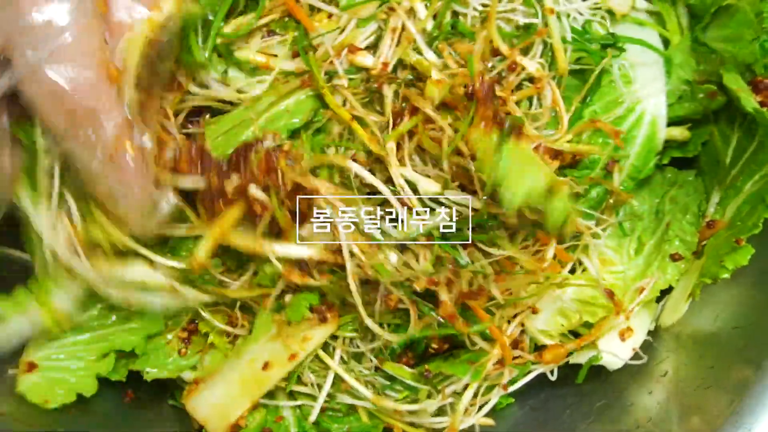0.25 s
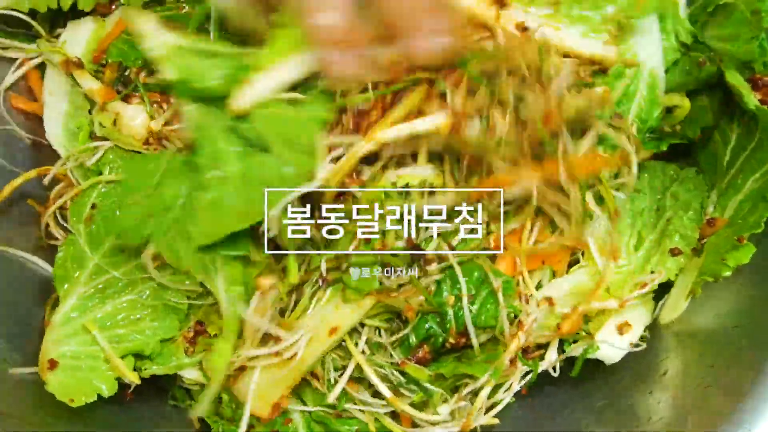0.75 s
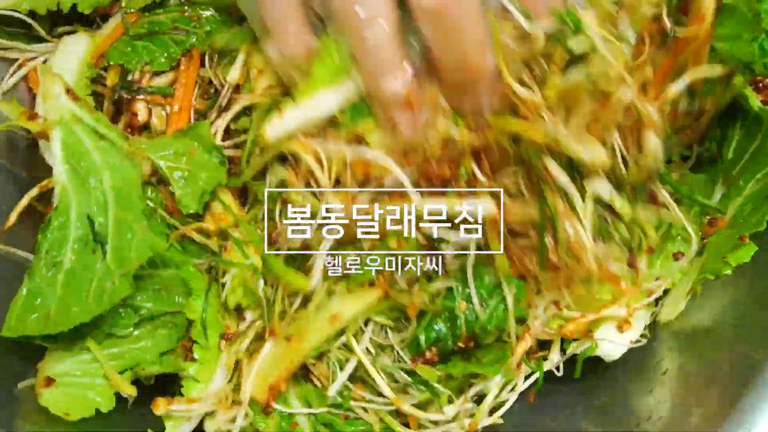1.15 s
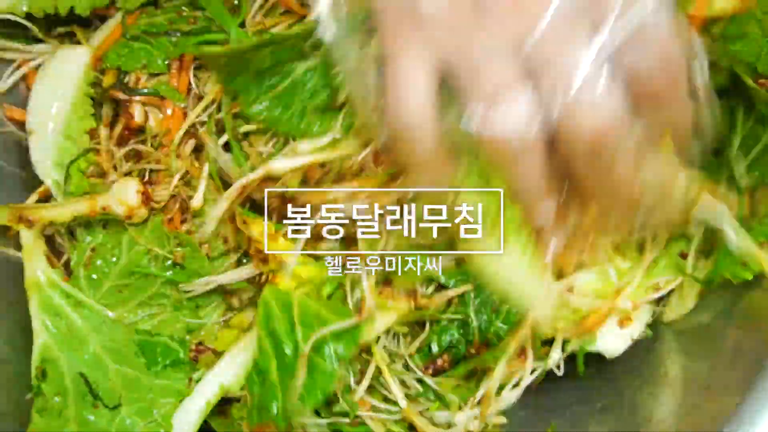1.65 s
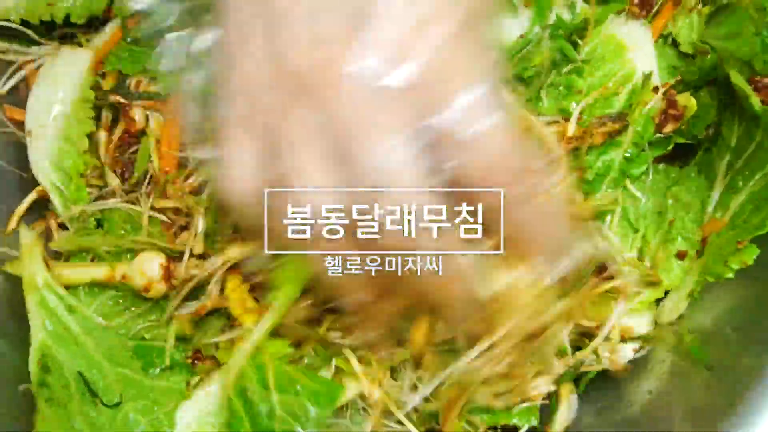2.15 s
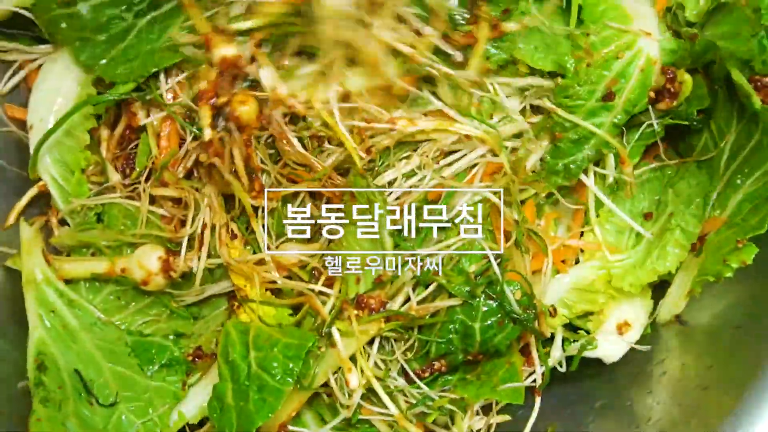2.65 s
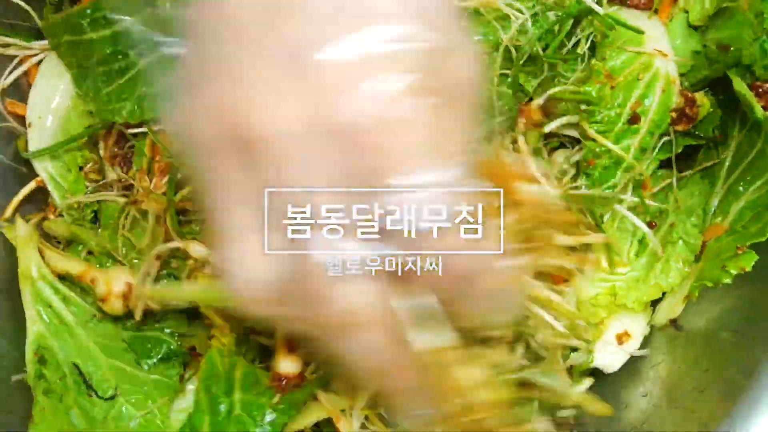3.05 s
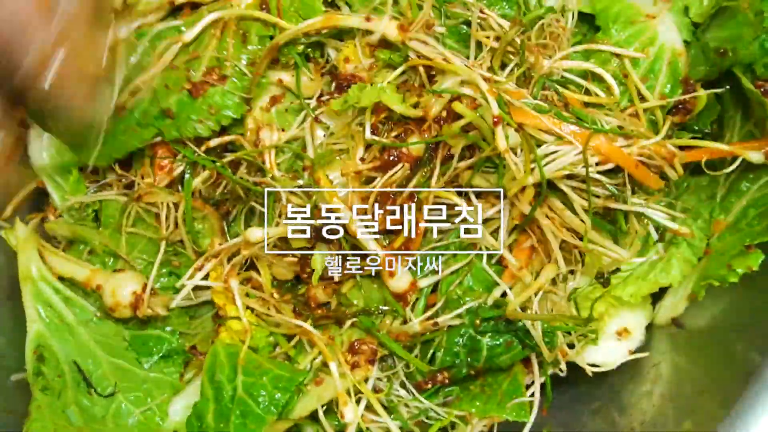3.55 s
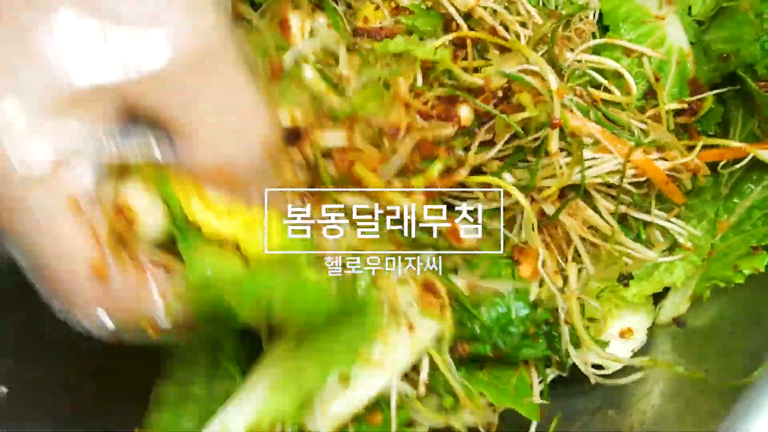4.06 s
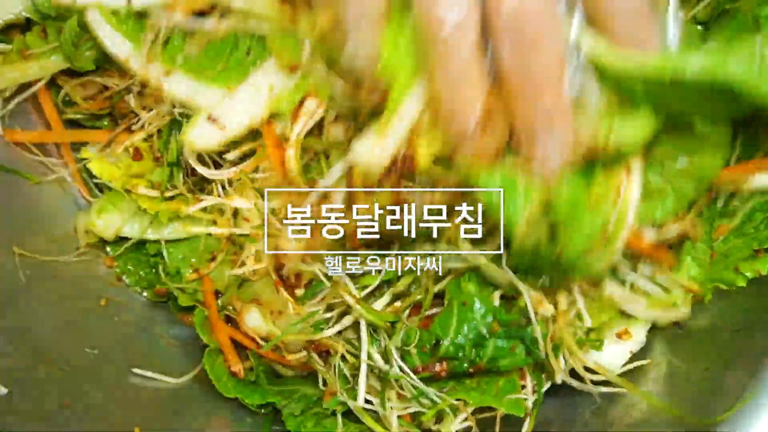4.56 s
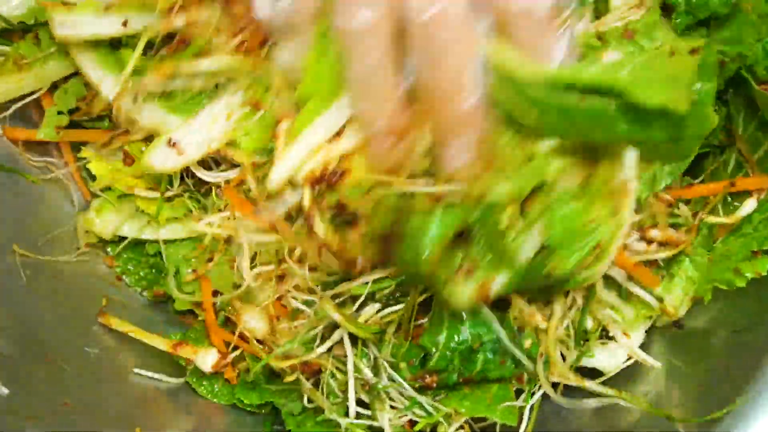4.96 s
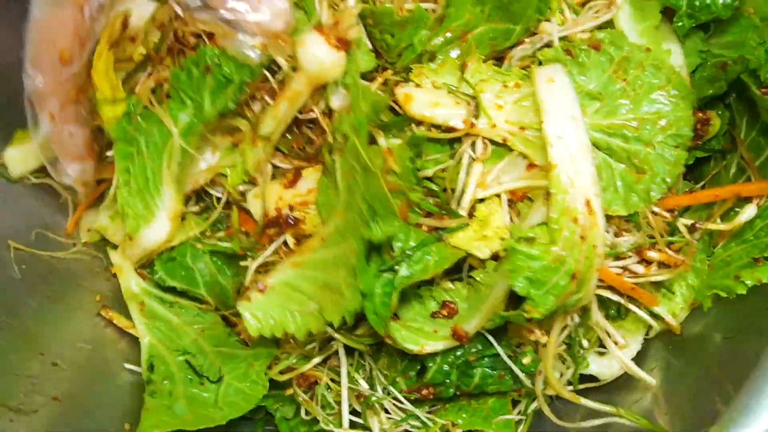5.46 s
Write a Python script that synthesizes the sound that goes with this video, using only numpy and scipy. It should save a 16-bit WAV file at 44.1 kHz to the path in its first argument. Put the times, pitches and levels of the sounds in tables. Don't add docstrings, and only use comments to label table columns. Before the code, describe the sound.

Close, jerky wet rustling of leafy vegetables being mixed by hand, thin plastic glove snapping, soft metal bowl scuffs, faint appliance hum behind.

```python
import sys
import numpy as np
from scipy import signal
from scipy.fft import rfft, irfft, next_fast_len
from scipy.io import wavfile
from scipy.ndimage import uniform_filter1d

SR = 44100
rng = np.random.default_rng(int(sys.argv[2]) if len(sys.argv) > 2 else 0)


def int16_out(signal):
    q = np.round(np.clip(np.atleast_2d(signal).T, -1, 1) * 32767)
    wavfile.write(sys.argv[1], SR, q.astype(np.int16))


def gain_from_db(level_db):
    decades = np.asarray(level_db, float) / 20
    return 10 ** decades


N = 251652
SIDES = np.array([[0.5], [-0.5]])

# (frequency [Hz], level [dB per Hz])
AIR_COLOUR = [(20, -30), (50, -19.5), (100, -6.5), (200, -13), (400, -15.5), (800, -17), (1150, -26),
              (1700, -22), (3000, -42), (8000, -48), (16000, -45)]
AIR_DB = -48.5
# (pitch [Hz], pitch waver [share], level [dB])
APPLIANCES = [
    (46.7, 0.021, -56),
    (122.1, 0.027, -63.5),
    (218.7, 0.023, -58.5),
]

# (full-effort start [s], hold [s], effort [dB], glove crumple against effort [dB])
STROKES = [(-0.018, 0.029, -36.5, -3.5), (0.119, 0.014, -32.5, -1), (0.177, 0.005, -33, -7.5),
           (0.307, 0.0055, -33, -3), (0.373, 0.011, -37, -4), (0.445, 0.19, -31, -1.0),
           (0.698, 0.28, -32, -2), (1.072, 0.006, -33.5, -2), (1.154, 0.023, -32.5, 0),
           (1.244, 0.2, -34, 1.5), (1.543, 0.21, -33, -1), (1.812, 0.22, -32, -1.8), (2.107, 0.17, -33, -2),
           (2.338, 0.13, -36.5, -1), (2.507, 0.12, -43.5, -3), (2.705, 0.052, -38, -3.5),
           (2.821, 0.12, -31.5, 0.2), (3.044, 0.005, -42.5, 2), (3.157, 0.047, -38, -5.5),
           (3.258, 0.0092, -32, -1), (3.339, 0.24, -32, -3), (3.621, 0.15, -30.5, -3.2),
           (3.775, 0.018, -24.5, -8.5), (3.87, 0.13, -31.5, -5), (4.388, 0.16, -32.5, -0.2),
           (4.522, 0.22, -29.5, -2), (4.832, 0.098, -34, -1.8), (5.056, 0.1, -36, -3.5),
           (5.273, 0.12, -29, -3), (5.404, 0.367, -26, -7)]
# (start [s], hold [s], effort [dB])
CRUNCHES = [
    (0.448, .01, -36),
    (0.76, 0.013, -34),
    (1.204, 0.0091, -35.5),
    (1.353, 0.028, -31),
    (1.672, 0.011, -29.5),
    (2.82, 0.008, -37),
    (5.554, 0.035, -32),
]
RISE_DB_PER_S, SAG_DB_PER_S, FALL_DB_PER_S, FILM_FALL_DB_PER_S, REST_DB = 308, 0.5, 118.5, 213, -59
# (time [s], left-right balance [dB])
HANDS = [
    (0.0, -1),
    (0.17, -0.5),
    (3.39, -0.5),
    (3.54, 2),
    (4.66, -1),
    (5.71, 2),
]

# (time [s], jump [dB])
SLIPS = [(0.012, 3.5), (0.087, 3), (0.107, 5), (0.2, 9.5), (0.277, 8), (0.297, 10), (0.402, 1),
         (0.458, 5), (0.47, -1), (0.501, -1), (0.537, 3.5), (0.569, 7), (0.579, 3.5), (0.591, 5),
         (0.619, 7), (0.636, 6), (0.677, 9.5), (0.709, 1.5), (0.735, 3), (0.805, 7.5), (0.842, 3.5),
         (0.896, 3), (0.937, 5.5), (0.973, 3), (1.007, 10), (1.093, 3.0), (1.139, -3), (1.16, 3.0),
         (1.211, 11), (1.294, 1), (1.319, 3.0), (1.383, 6.5), (1.449, -2), (1.569, -1), (1.632, 7.5),
         (1.664, 7.5), (1.714, 0), (1.749, 5), (1.806, 0), (1.89, 5.5), (1.916, 9), (1.951, 4.5),
         (1.987, 6.5), (2.001, 4.0), (2.023, 6), (2.084, 9), (2.157, 7.5), (2.201, 2), (2.267, 7),
         (2.338, 4), (2.379, 6.5), (2.401, 10), (2.447, 2), (2.458, -2), (2.503, 4.5), (2.53, 5),
         (2.568, 11), (2.67, 11), (2.766, 7),
         (2.852, 7.4), (2.891, 4.5), (2.984, 5), (3.023, 6), (3.059, 8.5), (3.158, 3.5), (3.198, 5.8),
              (3.277, 2.7), (3.358, 2.2), (3.405, 5.7), (3.415, 2.4), (3.528, 2.1), (3.546, 3.7),
              (3.6, 4.0), (3.644, 2.2), (3.695, 1.3), (3.75, 1.9), (3.765, 1.5), (3.794, 2.0), (3.825, 1.3),
              (3.885, 4.1), (3.919, 4.9), (3.95, 2.1), (4.059, 4.5), (4.099, 5.0), (4.132, 4.4), (4.374, 3),
              (4.396, 2.1), (4.433, 1.5), (4.45, 5.5), (4.485, 5.3), (4.515, 4.4), (4.55, 6.6),
              (4.573, 3.1), (4.618, 2.1), (4.661, 2.6), (4.694, 4.8), (4.712, 1.8), (4.782, 4.9),
              (4.836, 3.3), (4.848, 4.8), (4.876, 5.1), (4.945, 8), (5.026, 12), (5.078, 2.8), (5.115, 7.4),
              (5.145, 3), (5.184, 7.1), (5.221, 11), (5.265, 3.5), (5.31, 3.5), (5.378, 2.2), (5.408, 1.9),
              (5.469, 2), (5.488, 6.6), (5.51, 2.5), (5.584, 1.2), (5.616, 2.2), (5.669, 4.4),
         (4.018, 5),
    (4.029, 11),
    (4.047, 17),
    (4.075, 8),
    (4.16, 3),
    (4.204, 0),
    (4.296, 4),
    (4.313, 1),
    (4.331, 6),
]
SLIP_RISE_S, SLIP_FADE_S, SLIP_SHARE, STRAY_SLIP_SHARE = 0.0018, 0.0056, 0.86, 0.31
LOOSE_DB, LOOSE_RANGE_DB = -29.5, 1.5

# (frequency [Hz], level [dB])
LEAF_COLOUR = [(800, -2), (1100, -10), (1400, -8.5), (1900, -4.5), (2600, -4), (3600, -2.5), (5000, -4),
               (7500, -3), (12000, -5)]
# (time [s], centre [Hz])
LEAF_SIZE = [(0.0, 3160), (0.16, 3230), (1.76, 2700), (1.97, 3140), (2.34, 2580), (2.49, 3570),
             (2.54, 2950), (3.42, 2680), (3.5, 3400), (3.96, 2300), (4.16, 3000), (4.21, 2350),
             (4.56, 3360), (4.62, 2590), (5.32, 3200), (5.39, 2230), (5.59, 2200), (5.71, 2760)]
SIZE_WIDTH_HZ, SIZE_DB = 2150, -1
# (time [s], peak [dB], pitch [Hz])
STEM_TICKS = [(0.0887, -16, 3910), (0.2014, -15, 3450), (0.2778, -23, 3120), (0.4025, -16, 3660),
              (0.6784, -21, 2900), (0.9747, -15, 3360), (1.6646, -16, 2370), (1.8048, -19, 3530),
              (1.8931, -16, 2970), (1.9525, -14, 3170), (2.2677, -16, 2880), (2.37, -19, 3190),
              (2.4019, -22, 3420), (2.5027, -19, 3790), (2.8355, -17, 2610), (2.8549, -13, 2320),
              (2.8918, -19, 2890), (3.0584, -23, 3360), (3.7514, -16, 2140), (3.8262, -8, 2260),
              (4.366, -22, 2590), (4.4867, -17, 2240), (4.5506, -17, 3600), (4.6613, -15, 2720),
              (4.6942, -14, 2620), (5.0489, -18, 2520), (5.2555, -16, 3250), (5.3083, -18, 3500),
              (5.3807, -14, 2290), (5.6166, -13, 2650)]
# (time [s], peak [dB],
# pitch [Hz])
LEAF_TICKS = [(0.0343, -23, 3190), (0.5392, -16, 2390), (0.5686, -16, 2750), (0.7966, -15, 3630),
              (1.2057, -19, 3850), (2.3804, -20, 3140), (2.4593, -15, 4020), (2.5641, -25, 2620),
              (2.7686, -21, 3560), (2.9866, -21, 3940), (3.0014, -26, 4220), (3.0644, -26, 2280),
              (3.1592, -27, 2890), (3.241, -18, 3400), (3.6027, -16, 3340), (3.6456, -16, 2450),
              (3.9509, -20, 2100), (4.1011, -26, 4300), (4.133, -28, 2160), (4.1335, -29, 4500),
              (4.096, -31, 5200), (4.204, -36, 1100), (4.313, -36, 1800), (4.1609, -33, 4500),
              (4.2966, -36, 2560), (4.8364, -17, 3490), (4.8484, -20, 2590), (5.0769, -17, 4300),
              (5.1178, -18, 4200), (5.1472, -21, 2270), (5.1856, -24, 4140), (5.2235, -26, 2270),
              (5.4705, -16, 2230), (5.5857, -12, 2220),
              (0.0563, -29.0, 3220.0), (0.1367, -22.0, 4190.0), (0.2535, -29.0, 2820.0), (0.3, -23.0, 3040.0),
          (0.4606, -18.0, 4320.0), (0.6205, -19.0, 3810.0), (0.7365, -19.0, 4190.0),
          (0.8035, -18.0, 3220.0), (0.8434, -23.0, 4720.0), (0.9276, -21.0, 1990.0),
          (0.9401, -21.0, 2950.0), (1.0405, -23.0, 3890.0), (1.1552, -18.0, 2870.0),
          (1.3622, -19.0, 2800.0), (1.4185, -22.0, 4230.0), (1.5702, -20.0, 4760.0),
          (1.6103, -22.0, 4500.0), (1.647, -21.0, 4640.0), (1.7151, -21.0, 2750.0), (1.9747, -22.0, 2630.0),
          (2.0025, -21.0, 3260.0), (2.0788, -24.0, 3890.0), (2.1725, -22.0, 2400.0),
          (2.2574, -23.0, 4470.0), (2.5307, -23.0, 5140.0), (2.5827, -31.0, 4660.0),
          (2.9131, -20.0, 3680.0), (3.0223, -28.0, 4180.0), (3.302, -18.0, 4290.0), (3.3574, -20.0, 3200.0),
          (3.5728, -24.0, 4500.0), (3.6962, -21.0, 4380.0), (4.06, -25.0, 4210.0), (4.398, -23.0, 4530.0),
          (4.41, -23.0, 4460.0), (4.4348, -23.0, 4550.0), (4.4511, -20.0, 4130.0), (4.6193, -20.0, 2750.0),
          (4.6326, -19.0, 4470.0), (4.6784, -19.0, 3370.0), (4.784, -21.0, 2690.0), (4.9455, -22.0, 3210.0),
          (5.214, -24.0, 4160.0), (5.5133, -18.0, 2540.0), (5.7006, -15.0, 3390.0)]
ONSET_DELAY_S = 0.0012

# (frequency [Hz], level [dB])
FILM_COLOUR = [(2000, 0), (4000, 3.5), (6000, 3.5), (9000, 2.5), (12500, 4), (15000, -2), (17000, -15)]
# (time [s], peak [dB], film pitch [Hz],
# left-right balance [dB])
FILM_SNAPS = [(0.0742, -28, 9410, -1.0), (0.0877, -7, 12600, -0.5), (0.089, -8, 8000, 0.0),
              (0.4614, -7, 9530, 1.0), (0.6709, -15, 9450, -4.0), (0.7362, -14, 13300, 0.0),
              (1.0071, -13, 11100, -0.5), (1.1403, -10, 12700, -2.5), (1.3204, -7, 6860, 0.0),
              (1.491, -12, 11300, 1.0), (1.6038, -11, 10400, 2.0), (2.0832, -16, 10700, 0.5),
              (2.3231, -15, 8040, 0.0), (2.5022, -11, 7660, -3.0), (2.5306, -9, 10300, 0.5),
              (3.0579, -19, 8990, 0.5), (3.2745, -8, 10200, -5.0), (3.3288, -14, 12500, -1.5),
              (3.4052, -10, 14000, -1.5), (3.5294, -8, 7890, 2.5), (3.5972, -15, 10500, 2.0),
              (3.7319, -11, 12300, 3.0), (4.3979, -13, 12000, 1.0), (4.4353, -10, 13400, -1.0),
              (4.5501, -14, 6870, 0.0), (4.6194, -9, 11800, 1.5), (5.028, -22, 12300, -0.5),
              (5.0769, -10, 6070, -1.5), (5.1467, -12, 9840, 2.0), (5.255, -10, 6180, 1.5),
              (5.4789, -15, 7950, 1.5), (5.488, -11, 8000, 0.0), (2.712, -19, 9000, 0.0),
              (0.0564, -24, 8100, -4.0), (0.0976, -15, 7800, -2.0), (0.1085, -15, 8370, 2.0),
           (0.1998, -20, 6880, 3.0), (0.2773, -19, 5210, 5.0), (0.3089, -18, 8590, 3.0),
           (0.4715, -7, 9740, -3.0), (0.5796, -12, 7410, -1.0), (0.5913, -13, 12490, -2.0),
           (0.7105, -12, 9600, -1.0), (0.7911, -15, 14150, -5.0), (0.8166, -12, 12400, -1.0),
           (0.8848, -15, 11650, -2.0), (1.0956, -17, 10990, -1.0), (1.1197, -15, 10990, -2.0),
           (1.18, -15, 12450, -5.0), (1.647, -13, 8930, -5.0), (1.6576, -12, 10610, -2.0),
           (1.9526, -13, 6680, 5.0), (2.0012, -15, 9510, 1.0), (2.0231, -14, 10820, 2.0),
           (2.0558, -17, 11020, 0.0), (2.2685, -17, 8270, 5.0), (2.4489, -16, 11380, -2.0),
           (2.4593, -13, 7880, -3.0), (2.5374, -14, 10330, 3.0), (2.5711, -24, 6220, 3.0),
           (2.7201, -16, 10410, 1.0), (2.768, -19, 7830, -4.0), (2.8917, -16, 8030, 4.0),
           (3.0642, -20, 8920, 3.0), (3.3019, -14, 5660, -5.0), (3.3551, -15, 13500, -3.0),
           (3.4182, -12, 7250, -4.0), (3.9624, -18, 11750, 0.0), (4.0197, -19, 6330, 5.0),
           (4.06, -25, 6730, 2.0), (4.758, -17, 8640, -4.0), (4.8488, -16, 9690, 4.0),
           (4.8782, -18, 5700, -4.0), (4.936, -16, 11670, -1.0), (5.1175, -20, 5360, -3.0),
           (5.4109, -14, 10540, 2.0), (5.6051, -15, 10460, -1.0), (5.6914, -14, 10070, 5.0)]
CREASE_HZ, STRAY_CREASES_PER_S, STRAY_CREASE_DB = 7870, 5, 16
SNAP_TILT_DB_PER_OCT = -3

# (frequency [Hz], width [Hz], level [dB])
HOLLOW = [
    (364, 78, -15),
    (547, 36, -4.5),
    (759, 88, 2.5),
    (864, 46, 2.5),
    (1293, 270, -2.5),
]
# (time [s], bowl rub against effort [dB])
DEPTH = [(0.0, -9.5), (0.12, -14), (0.42, -11), (1.0, -11.5), (1.3, -7.5), (1.7, -11), (2.3, -10),
         (2.55, -12.5), (2.85, -7.5), (3.1, -9), (3.3, -10.5), (3.75, -10.5), (4.1, -12.5), (4.4, -15.5),
         (4.6, -9.5), (5.1, -12), (5.4, -11), (5.71, -12.5)]
# (time [s], peak [dB], pitch [Hz])
KNOCKS = [(1.197, -27.5, 789), (2.73, -29, 750), (2.755, -30, 760), (2.85, -17.5, 820), (2.913, -21.5, 813),
          (3.255, -29, 757), (3.75, -20.5, 855), (4.028, -33, 730), (4.35, -26, 720), (4.564, -21, 750),
          (4.693, -22.5, 754), (5.267, -21, 372), (5.347, -19, 730), (5.441, -25, 337), (5.641, -21, 884)]
# (start [s], hold [s], level [dB])
SHOVES = [
    (1.2, .02, -58),
    (1.65, 0.028, -49),
    (2.0, 0.025, -44),
    (2.83, 0.026, -39),
    (3.69, 0.02, -39),
    (3.76, 0.029, -37),
    (4.47, .05, -58),
    (5.28, 0.093, -38.5),
    (5.43, 0.13, -40),
    (5.62, .08, -42),
]
PRESS_SHARE, PRESS_DB = 0.53, -32.5
SHIFT_PER_S = 1.707

# (frequency [Hz], level [dB])
MIC_RESPONSE = [(20, 2), (40, -2), (15800, -1.08), (17000, -26)]
START_S, EDGE_HZ = 0.008, 15950


def evened(x):
    return x / np.sqrt(np.mean(x ** 2) + 1e-20)


def read(points, hz):
    f, value = np.transpose(points)
    return np.interp(np.log(hz + 1), np.log(f + 1), value)


def curve(table, column):
    rows = np.array(table)
    return np.interp(np.arange(N) / SR, rows[:, 0], rows[:, column])


def colour(x, points):
    size = next_fast_len(x.shape[-1])
    gain = gain_from_db(read(points, np.fft.rfftfreq(size, 1 / SR)))
    return irfft(rfft(x, size) * gain, size)[..., :x.shape[-1]]


def fading(kicks, fade_s):
    return signal.lfilter([1], [1, -np.exp(-1 / (fade_s * SR))], kicks)


def hum(hz, waver, db):
    smooth = uniform_filter1d(uniform_filter1d(rng.standard_normal((2, N)), 1500), 1500)
    drift, strength = evened(smooth[0]), evened(smooth[1])
    phase = 2 * np.pi * np.cumsum(hz * (1 + waver * drift)) / SR
    return gain_from_db(db + 2.1 * strength) * np.sqrt(2) * np.sin(phase)


def kitchen():
    middle, side = rng.standard_normal((2, N))
    side = colour(side, [(40, -31), (300, -8.0), (1500, -4), (5000, 15), (16000, -4)])
    air = evened(colour(np.array([middle + side, middle - side]), AIR_COLOUR))
    return gain_from_db(AIR_DB) * air + sum(hum(*row) for row in APPLIANCES)


def swell(rows, fall_db_per_s):
    start, hold, db = np.transpose(rows)[:, :, None]
    coarse = np.arange(0, N + 64, 64)
    t = coarse / SR - start
    rise = RISE_DB_PER_S * np.minimum(t, 0)
    sag = SAG_DB_PER_S * np.clip(t, 0, hold)
    fall = fall_db_per_s * np.maximum(t - hold, 0)
    power = (gain_from_db(db + rise - sag - fall) ** 2).sum(0) + gain_from_db(REST_DB) ** 2
    return np.interp(np.arange(N), coarse, 10 * np.log10(power))


def effort():
    return swell([row[:3] for row in STROKES] + CRUNCHES, FALL_DB_PER_S)


def jerks(per_s, fade_s):
    kicks = rng.exponential(1, N) * np.clip((per_s / SR - rng.random(N)) * 3000, 0, 1)
    saw = fading(kicks, fade_s)
    return np.minimum(evened(saw - saw.mean()), 1.8)


def grip():
    kicks = np.zeros(N)
    for s, db in SLIPS:
        kicks[round(s * SR)] = db
    quick = np.exp(-1 / (SLIP_RISE_S * SR))
    saw = signal.lfilter([1 - quick], [1, -quick], fading(kicks, SLIP_FADE_S))
    loose = np.clip((LOOSE_DB - effort()) / LOOSE_RANGE_DB, 0.3, 1.3)
    slip = SLIP_SHARE * saw + STRAY_SLIP_SHARE * loose * jerks(78, 0.012)
    return slip - uniform_filter1d(slip, size=2600)


def placed(grain, lag_us, pan_db):
    hz = np.fft.rfftfreq(len(grain), 1 / SR)
    turns = SIDES * lag_us * 1e-6 * 5000 * np.tanh(hz / 5000) + hz * 8 / SR
    return irfft(rfft(grain) * np.exp(-2j * np.pi * turns), len(grain)) * gain_from_db(SIDES * pan_db)


def burst(hz, cycles, rough, noise):
    t = np.arange(len(noise)) / SR
    ring = (np.sin(2 * np.pi * hz * t) + rough * noise) * np.exp(-t * hz / cycles)
    ring = signal.lfilter(*signal.butter(2, min(0.36 * hz, 9000), "high", fs=SR), ring)
    return ring / abs(ring).max()


def snapped(hz, cycles, rough, noise, lag_us, pan_db):
    pair = placed(burst(hz, cycles, rough, noise), lag_us, pan_db)
    return pair / abs(pair.mean(0)).max()


def grains(lo_hz, hi_hz, cycles, rough, per_s, spread_db, lag_us, count):
    size = gain_from_db(spread_db * np.minimum(rng.exponential(1, N), 3.1))
    size = size * rng.choice([-1, 1], N) * np.clip((per_s / SR - rng.random(N)) * 300, 0, 1)
    patch, out = rng.integers(0, count, N), np.zeros((2, N))
    for k, hz in enumerate(np.geomspace(lo_hz, hi_hz, count)):
        grain = burst(hz, cycles, rough, rng.standard_normal(256))
        lag = (-1) ** k * lag_us * rng.uniform(0.3, 1.47)
        grain = placed(grain / np.linalg.norm(grain), lag, 0.48 * rng.standard_normal())
        out += signal.oaconvolve((size * (patch == k))[None], grain, axes=1)[:, :N]
    return out


def add(mix, s, sound):
    part = mix[:, round(s * SR) - 8:][:, :sound.shape[1]]
    part += sound[:, :part.shape[1]]


def settling(events, kick_db, fade_s):
    kicks = np.zeros(N)
    for s, db, *_ in events:
        kicks[round((s + ONSET_DELAY_S) * SR)] = gain_from_db(db + kick_db)
    return 1 + fading(kicks / gain_from_db(effort() + 27.5), fade_s)


def resonate(x, hz, width):
    r = np.exp(-np.pi * width / SR)
    return signal.lfilter([1 - r, 0, r - 1], [1, -2 * r * np.cos(2 * np.pi * hz / SR), r * r], x)


def follow(x, hz, width):
    turn, r = np.exp(2j * np.pi * np.cumsum(hz) / SR), np.exp(-np.pi * width / SR)
    return 2 * (turn * signal.lfilter([1 - r], [1, -r], x / turn)).real


def leaves(slip):
    rustle = grains(1195, 5370, cycles=1.8, rough=0.36, per_s=2904, spread_db=2.0, lag_us=31, count=16)
    rustle = rustle * gain_from_db(1.44 * slip) * settling(STEM_TICKS, kick_db=16.5, fade_s=0.0015)
    rustle = evened(colour(rustle, LEAF_COLOUR))
    level = effort()
    heavy = gain_from_db(3.6 * (level + 26) - 13.5) * resonate(rustle, 1300, 590)
    sized = gain_from_db(SIZE_DB) * follow(rustle, curve(LEAF_SIZE, 1), SIZE_WIDTH_HZ)
    out = gain_from_db(level - 3.0) * (rustle + heavy + sized)
    clear = STEM_TICKS + LEAF_TICKS
    for (s, db, hz), noise in zip(clear, rng.standard_normal((len(clear), 512))):
        tick = snapped(hz, 2.1, 0.35, noise, lag_us=30 * noise[0], pan_db=1.5 * noise[1])
        add(out, s + ONSET_DELAY_S, gain_from_db(db + 2.5) * tick)
    return out


def glove(slip):
    folds = FILM_SNAPS
    crackle = grains(3930, 18050, cycles=3.8, rough=1.16, per_s=2730, spread_db=6.0, lag_us=46.0, count=16)
    crackle = crackle * gain_from_db(2.1 * slip + 3.4 * jerks(141, 0.0011))
    crackle = crackle * settling(folds, kick_db=0, fade_s=0.006)
    strays = grains(7500, 12000, cycles=3.8, rough=0.67, per_s=STRAY_CREASES_PER_S, spread_db=0.0,
                    lag_us=24, count=2)
    crumple = swell([(s, hold, db + film_db) for s, hold, db, film_db in STROKES], FILM_FALL_DB_PER_S)
    film = evened(colour(crackle, FILM_COLOUR)) + gain_from_db(STRAY_CREASE_DB + 23) * strays
    out = gain_from_db(crumple + 3.1) * film
    for (s, db, hz, pan_db), noise in zip(folds, rng.standard_normal((len(folds), 512))):
        snap = snapped(hz, 3.2, 1.0, noise, lag_us=40 * noise[0], pan_db=pan_db)
        tilt_db = SNAP_TILT_DB_PER_OCT * np.log2(CREASE_HZ / hz)
        add(out, s + ONSET_DELAY_S, gain_from_db(db + 1.5 + tilt_db) * snap)
    return out


def bowl(slip):
    scuffs = grains(310, 1300, cycles=1.0, rough=0.75, per_s=800, spread_db=-1.5, lag_us=82, count=6)
    scuffs = scuffs * gain_from_db(1.46 * slip)
    hollow = sum(gain_from_db(db) * resonate(scuffs, hz, width) for hz, width, db in HOLLOW)
    hollow = hollow + gain_from_db(-16.5) * scuffs
    hollow = colour(hollow, [(150, -24), (400, 3.5), (900, -0.5), (1100, 2.0), (1400, 1.0), (3000, -47)])
    rub = effort() + curve(DEPTH, 1)
    out = gain_from_db(rub + 2.37) * evened(hollow)

    t = np.arange(8192) / SR
    for s, db, hz in KNOCKS:
        decay = gain_from_db(db - 1.5 - 60 * t / 0.041 * hz / 760)
        ring = np.sin(2 * np.pi * hz * t) * decay * (1 - np.exp(-t / 0.0018))
        add(out, s, np.array([ring, ring]))

    push = colour(rng.standard_normal((2, N)), [(50, -11), (110, 3.0), (220, -1.5), (380, -4.0), (600, -18.5)])
    press = gain_from_db(PRESS_SHARE * rub + PRESS_DB)
    shove = gain_from_db(swell(SHOVES, FALL_DB_PER_S) - 2.5)
    return out + np.hypot(press, shove) * evened(push[0] + 0.024 * push)


def walls(x, t60):
    t = np.arange(6000) / SR
    signs = rng.choice([-1., 1.], (2, len(t)))
    sparse = rng.random((2, len(t))) < 0.07
    middle, side = signs * sparse * gain_from_db(-60 * t / t60) * (t > 0.0008)
    side = signal.lfilter(*signal.butter(1, 2500, "high", fs=SR), side)
    tail = np.array([middle + side, middle - side]) / np.linalg.norm(middle + side)
    return signal.oaconvolve(x.mean(0)[None], tail, axes=1)[:, :N]


def scene():
    slip = grip()
    hands = (leaves(slip) + glove(slip)) * gain_from_db(curve(HANDS, 1) * SIDES)
    turn = 2 * np.pi * SHIFT_PER_S * np.arange(N) / SR
    echo = walls(hands * np.cos(turn), t60=0.017) + walls(hands * np.sin(turn), t60=0.097)
    return hands + gain_from_db(-9.0) * echo + bowl(slip) + kitchen()


def low_pass(x):
    return signal.sosfilt(signal.butter(12, 16970, fs=SR, output="sos"), x)


def record(dry):
    x = colour(dry, MIC_RESPONSE)
    top = signal.oaconvolve(x, signal.firwin(401, EDGE_HZ, pass_zero=False, fs=SR)[None], "same")
    power = (top ** 2).mean(0)
    sudden = uniform_filter1d(power, 90) > 18 * uniform_filter1d(power, 2200)
    kept = np.clip(uniform_filter1d(sudden * 8., 300), 0, 1)
    fade_in = np.clip((np.arange(N) / SR - START_S) / 0.0015, 0, 1)
    return low_pass((x - top * (1 - kept)) * fade_in)


dry = scene()
out = record(dry)
int16_out(out)
```